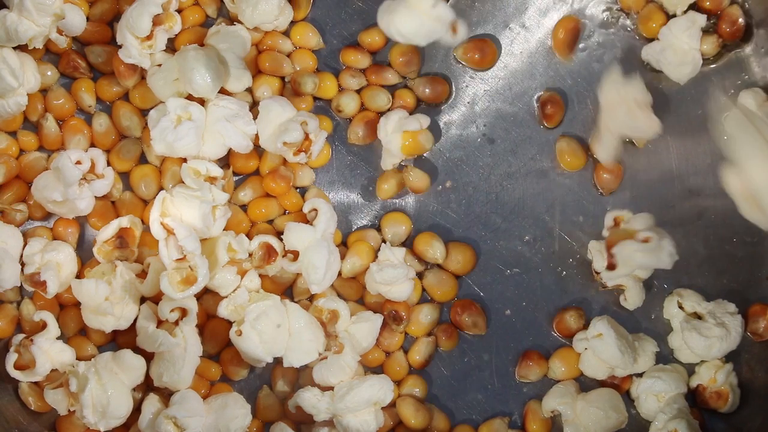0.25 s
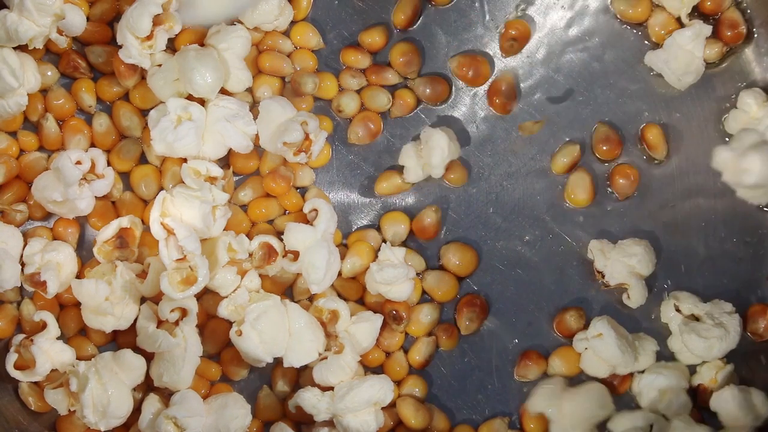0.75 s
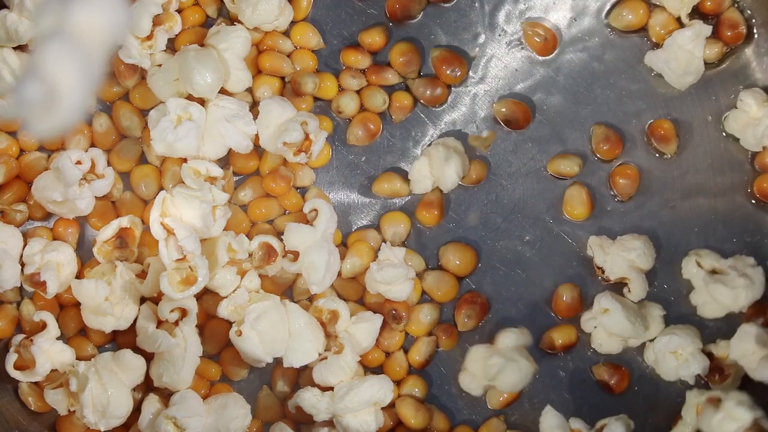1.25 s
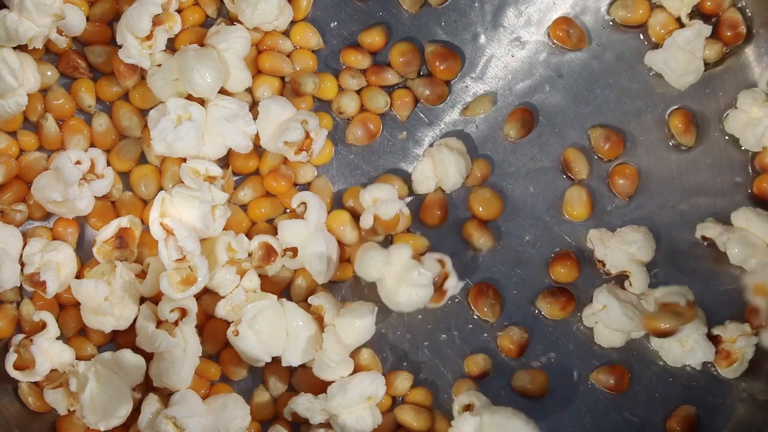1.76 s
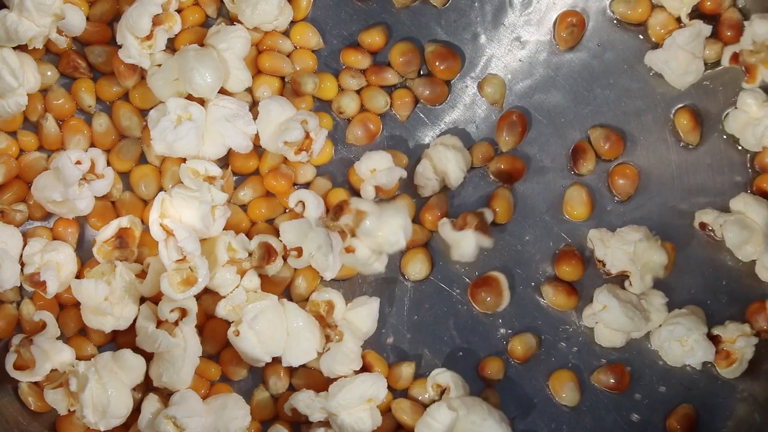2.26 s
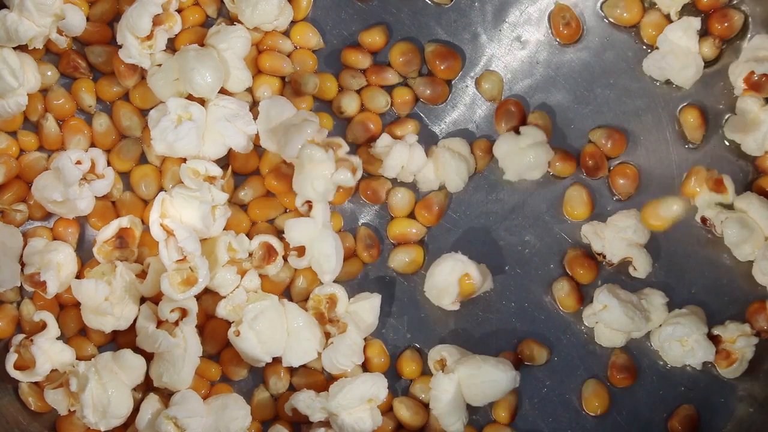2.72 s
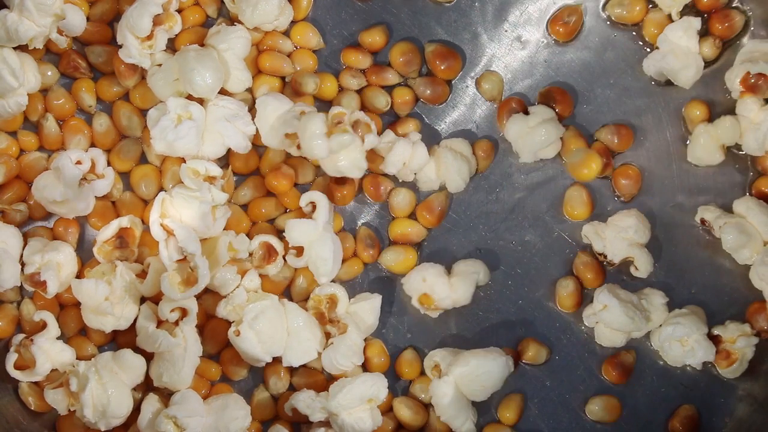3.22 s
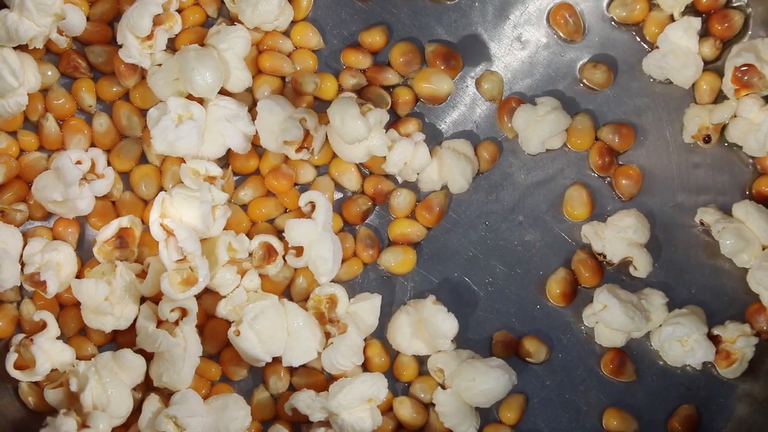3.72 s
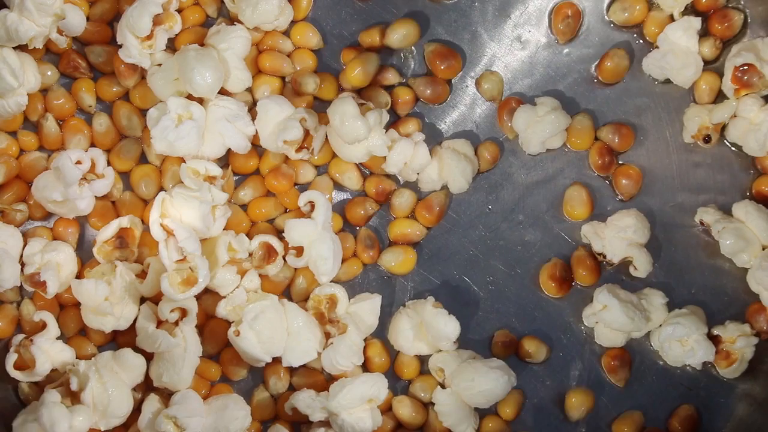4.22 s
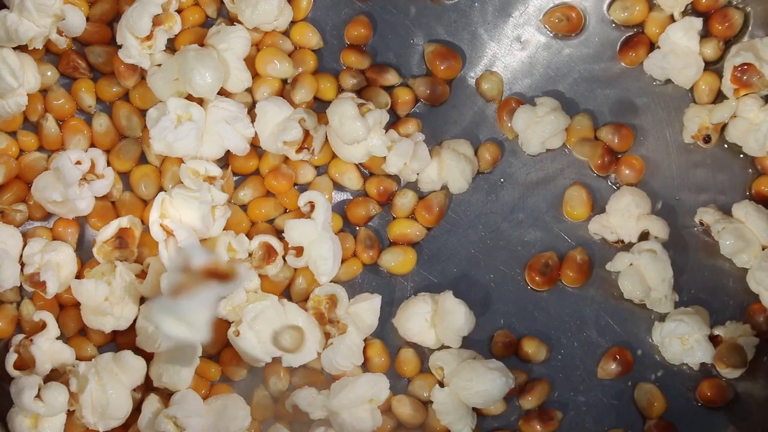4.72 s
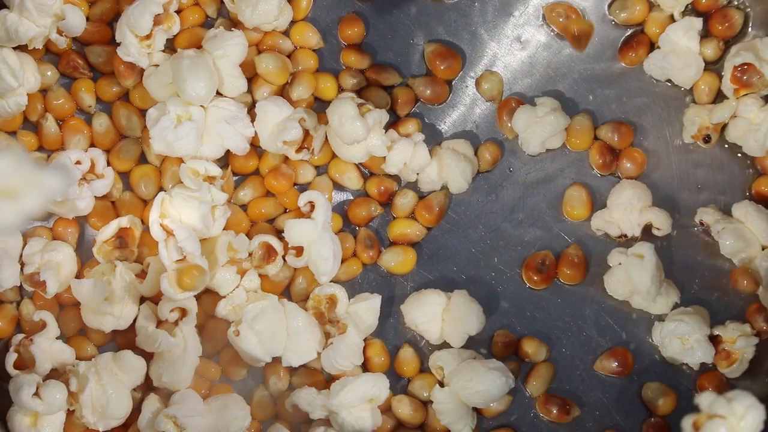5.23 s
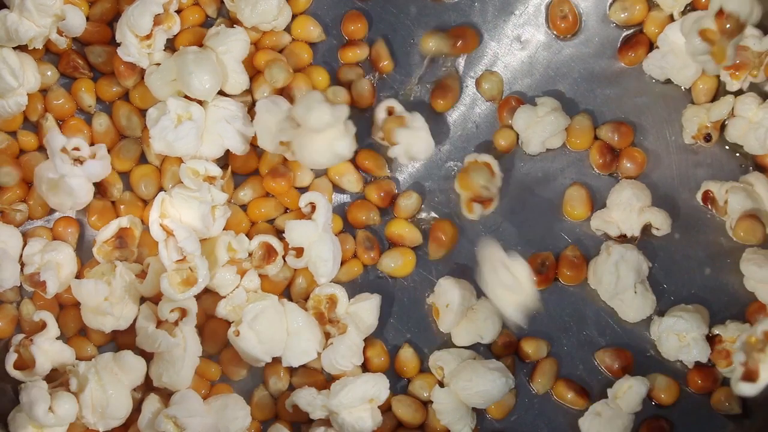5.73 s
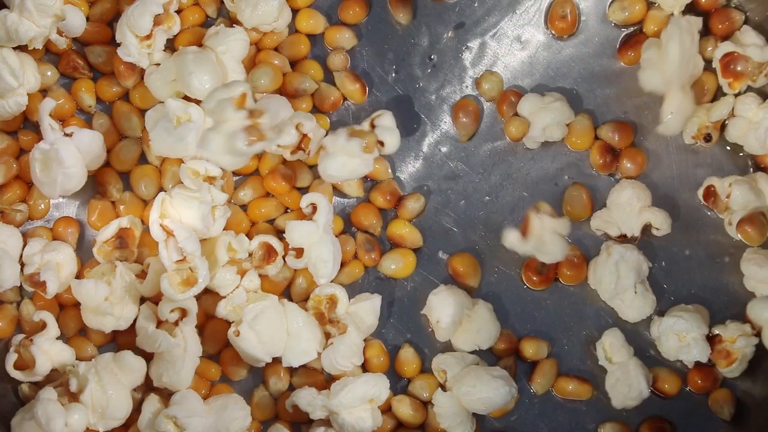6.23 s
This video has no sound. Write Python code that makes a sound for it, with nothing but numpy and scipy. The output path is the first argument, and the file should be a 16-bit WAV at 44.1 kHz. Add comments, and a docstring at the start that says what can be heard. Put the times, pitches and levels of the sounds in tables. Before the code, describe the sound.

Close to a hot metal pan in a kitchen, slowed popcorn bursts sound deep and muffled. A loud crackling cluster comes at the start, single and double pops follow, then a long quiet simmer, another hard double bang, and a final flurry with a brief metallic ring. Light kernel taps follow the pops; oil sizzles faintly underneath.

```python
"""A kitchen, close to a hot metal pan: corn pops in slow motion, so that everything is deep and dull.
Each burst of steam is one pressure pulse that echoes between the pan's walls, rings the air inside and
dies away in the room. Kernels landing in the pan are softer pulses; the metal rings as decaying modes.
Coloured noise sizzles softly underneath as oil, with faint hum and leaking steam.
The loudest pops overload into a brief crackle."""
import sys
import numpy as np
from scipy import signal
from scipy.fft import rfft, irfft, next_fast_len
from scipy.io import wavfile
from scipy.ndimage import map_coordinates

SR = 44100
rng = np.random.default_rng(int(sys.argv[2]) if len(sys.argv) > 2 else 0)


def master_out(mix):
    """Clip the mix to full scale and print it as 16-bit PCM to the path in sys.argv[1]."""
    frames = np.transpose(np.atleast_2d(mix))
    ceiling = np.clip(frames, -1, 1)
    pcm = np.round(ceiling * 32767).astype(np.int16)
    wavfile.write(sys.argv[1], SR, pcm)


N = 285327  # length in samples
BAND_HZ = 1840  # upper band edge left by the slow motion


def amp(db):
    """Level law: decibels to amplitude gain."""
    return 10 ** (np.asarray(db) / 20)


def unit(x):
    """Normalisation: scale to an rms of 1."""
    return x / np.sqrt(np.mean(x ** 2) + 1e-20)


def along(points, hz):
    """Interpolation on a logarithmic frequency axis through (Hz, value) points."""
    f, value = np.transpose(points)
    return np.interp(np.log(hz + 1), np.log(f + 1), value)


def wobble(rate):
    """Smooth random modulation: a curve through random knots, rate of them a second."""
    knots = rng.standard_normal(int(N * rate / SR) + 4)
    return map_coordinates(knots, [np.arange(N) * rate / SR])


def filtered(x, response):
    """Linear filtering: the spectrum of x times a complex response of frequency."""
    n = x.shape[-1]
    padded = next_fast_len(n + 8192)
    spectrum = rfft(x, padded) * response(np.fft.rfftfreq(padded, 1 / SR))
    return irfft(spectrum, padded)[..., :n]


def add(track, s, sound):
    """Superposition: mix a sound into a track at s seconds, cutting what falls outside."""
    start = round(s * SR)
    sound = sound[..., max(-start, 0):]
    part = track[..., max(start, 0):][..., :sound.shape[-1]]
    part += sound[..., :part.shape[-1]]


def slowed(hz):
    """Frequency scaling: slow motion leaves almost nothing above a low band edge."""
    return 1 / np.sqrt(1 + (hz / BAND_HZ) ** 60)


def ringing(modes, t, scatter_db):
    """Modal decay: modes of random strength for each blow, with random phases in each channel."""
    hz, db, t60 = np.transpose(modes)[:, :, None]
    wave = amp(db - 60 * t / t60) * np.exp(2j * np.pi * hz * t)
    strength = amp(scatter_db * rng.standard_normal((2, len(modes))))
    phase = np.exp(2j * np.pi * rng.random((2, len(modes))))
    return ((strength * phase) @ wave).real


# Likeness of the two channels in noise. Each row: frequency in Hz, correlation from -1 to 1.
LIKENESS = [(25, 0.88), (60, 1), (120, -0.048), (200, -0.38), (370, 0.18), (470, -0.091), (700, 0.37),
            (1000, -0.099), (1900, 0.024)]


def noise_pair(spectrum, count):
    """Interchannel coherence: coloured stereo noise of rms 1 whose likeness varies with frequency."""
    def colour(hz):
        angle = np.arccos(np.clip(along(LIKENESS, hz), -1, 1)) / 2
        return amp(along(spectrum, hz)) * slowed(hz) * np.array([np.cos(angle), np.sin(angle)])

    mid, side = filtered(rng.standard_normal((2, count)), colour)
    return unit(np.array([mid + side, mid - side]))


FRONT_PER_PITCH = 0.3  # a higher pulse has a sharper front


def burst(pitch_hz, base_front_hz):
    """Pressure release: one pulse of peak 1, a sharp dip and then a broader push."""
    kick = np.zeros(SR // 20)
    kick[0] = 1
    front_hz = base_front_hz + FRONT_PER_PITCH * pitch_hz

    def response(f):
        puff = -1j * f * pitch_hz / (pitch_hz ** 2 - f ** 2 + 1j * f * pitch_hz)
        front = front_hz ** 2 / (front_hz ** 2 - f ** 2 + 1.2j * f * front_hz)
        return puff * front

    pulse = filtered(kick, response)
    return pulse / np.abs(pulse).max()


# Kernels bursting. Each row: start in seconds, peak of the direct pulse in dB, pitch in Hz,
# weakening of the right channel in dB, kick on the pan's bottom in dB.
POPS = [(-0.08, -8, 152, 1, -38), (0.0668, 5.5, 208, 0.5, -17.5), (1.0583, 3, 455, 2.5, -27.5),
        (1.6174, -16.5, 207.6, -1.5, -42.5), (1.703, -30.5, 800, -8.5, -62), (1.771, -15, 243, -4, -33.5),
        (2.3422, -0.5, 163.7, 4, -17), (2.4284, -3, 280, 5, -41.5), (4.3156, 0.5, 284, 0, -19.5),
        (4.343, 1, 280, -1.5, -22), (5.8439, -12.5, 826, -1, -27.5), (5.8648, -12.5, 917, -5.5, -27.5),
        (5.955, -10, 473, 1, -31), (6.078, 5, 242, -3.5, -35), (6.4268, 0.5, 172, 8, 0.5)]
# ring of a full-scale burst in dB; weaker bursts lie further off and ring more
POP_RING_DB, RING_DB_PER_DB = -0.82, 0.41


def bursts():
    """Sudden expansion: steam breaks out in a deep pulse, as (s, pulse, ring dB, right weakening dB)."""
    return [(s, amp(db) * burst(pitch_hz, base_front_hz=620), POP_RING_DB - RING_DB_PER_DB * db, right_weaker_db)
            for s, db, pitch_hz, right_weaker_db, _ in POPS]


# The hull tearing further after a burst. Each row: start in seconds, peak of the direct pulse in dB,
# pitch in Hz, weakening of the right channel in dB.
SNAPS = [(0.0879, 7, 550, 1.5), (0.0937, 4, 330, 4), (0.0975, 3.5, 1090, 3), (0.1028, -1.5, 1114, 1.5),
         (0.1075, -3, 825, 16), (1.0729, 1, 555, 5), (1.7841, -9, 710, 18), (2.3556, -5.5, 260.6, 5),
         (2.358, -10.5, 1400, 4), (2.3689, -9, 910, 3), (4.3497, 5, 515, 2), (4.3541, 0.5, 629, 6),
         (4.3587, 1.5, 793, 5), (4.3675, 1.5, 1093, 7), (5.8772, -12, 1058, 10), (5.884, -14, 199.5, 0),
         (6.09, 6.5, 646, 16), (6.437, -0.5, 702, 3.5)]
# a snap closer to the left is also drier
SNAP_RING_DB, DRY_DB_PER_DB = -6, 0.9


def snaps():
    """Fracture: the hull tears on in drier, sharper pulses."""
    return [(s, amp(db) * burst(pitch_hz, base_front_hz=826),
             SNAP_RING_DB - DRY_DB_PER_DB * right_weaker_db, right_weaker_db)
            for s, db, pitch_hz, right_weaker_db in SNAPS]


# Kernels landing in the pan. Each row: start in seconds, peak of the direct pulse in dB.
KNOCKS = [(0.1486, -12.5), (0.1724, -20), (0.1811, -19), (0.2375, -20), (0.2498, -37), (0.3326, -27),
          (0.6279, -29.5), (1.136, -18.5), (1.1553, -20.5), (1.178, -28), (1.3971, -36), (1.7268, -27.5),
          (1.745, -29), (2.9236, -31), (3.78, -37), (4.144, -30.5), (4.4368, -20), (4.5476, -29),
          (5.916, -19.5)]
KNOCK_HZ, KNOCK_SPREAD = 760, 0.12  # typical pitch; its scatter in octaves
KNOCK_RING_DB, KNOCK_RIGHT_WEAKER_DB = -5.5, 3.5


def knocks():
    """Impact: tossed kernels land with light, much alike taps."""
    pitches = KNOCK_HZ * 2 ** (KNOCK_SPREAD * rng.standard_normal(len(KNOCKS)))
    return [(s, amp(db) * burst(pitch_hz, base_front_hz=560), KNOCK_RING_DB, KNOCK_RIGHT_WEAKER_DB)
            for (s, db), pitch_hz in zip(KNOCKS, pitches)]


# Early echoes off the pan's walls. Each row: delay in seconds, relative left gain, relative right gain.
WALLS = [(.0087, 0.89, 0.16), (0.0092, 0.19, -0.17), (0.012, -0.96, -0.0031), (0.0133, -0.59, 0.27),
         (0.0204, -0.14, 0.19), (0.0269, -0.17, .06)]


def wall_echoes(pulse, low_cut_hz):
    """Specular reflection: the walls send back thinner copies of a pulse."""
    thin = filtered(pulse, lambda f: 1j * f / (low_cut_hz + 1j * f))
    echoes = np.zeros((2, 2 * len(pulse)))
    for delay, left, right in WALLS:
        add(echoes, delay, np.outer([left, right], thin))
    return echoes


# Colour of the diffuse tail. Each row: frequency in Hz, relative level in dB per Hz.
TAIL = [(25, 2.5), (60, 0.5), (110, -5.5), (160, -6.5), (230, -7), (340, -5.5), (700, -1.5), (1000, 2),
        (1400, -1), (1900, 7.5)]
# Decay of the kitchen. Each row: frequency in Hz, t60 in seconds.
KITCHEN = [(60, 0.48), (160, 0.41), (420, .4), (1100, 0.32), (1900, 0.32)]
# Modes of the air in the pan. Each row: frequency in Hz, relative level in dB, t60 in seconds.
AIR = [(117.8, -6.5, 0.33), (233.7, -10.5, 0.37), (317.6, 2, 0.24), (345, -5.5, 0.37), (413.5, -8, 0.38),
       (466, -5, 0.36), (613.6, 4, 0.18), (681.5, 1, 0.3), (756, -6.5, 0.29), (812, -12.5, 0.44),
       (900, 3, 0.12), (1019, -6, 0.38), (1130, -9.5, 0.31), (1220, -10.5, .3), (1400, -17, 0.42),
       (1700, -8, .28)]


def reverberation(t, scatter_db, scatter_t60, room_db, air_db, build_s):
    """Diffuse field: dense scatter in the pan dies fast; the pan's air and the kitchen ring on."""
    scatter = amp(scatter_db - 60 * t / scatter_t60) * noise_pair(TAIL, len(t))
    hz, when, cells = signal.stft(noise_pair(TAIL, len(t)), SR, nperseg=512)
    decay = amp(-60 * when / along(KITCHEN, hz)[:, None])
    room = signal.istft(cells * decay, SR, nperseg=512)[1][:, :len(t)]
    air = ringing(AIR, t, scatter_db=3)
    build_up = 1 - np.exp(-(t / build_s) ** 2)
    return (scatter + amp(room_db) * room + amp(air_db) * air) * build_up


def hollow(hz, dip_hz, width_hz, depth):
    """Resonant absorption: the pan swallows part of one low band of every pulse."""
    return 1 - depth * 1j * hz * width_hz / (dip_hz ** 2 - hz ** 2 + 1j * hz * width_hz)


def in_pan(pulses, lag_s, left_db, right_db):
    """Propagation: each pulse arrives directly, later on the left, then as echoes and reverberation."""
    out, t = np.zeros((2, N)), np.arange(SR // 3) / SR
    for s, pulse, ring_db, right_weaker_db in pulses:
        add(out[0], s + lag_s / 2, pulse)
        add(out[1], s - lag_s / 2, amp(-right_weaker_db) * pulse)
        add(out, s, amp(ring_db / 2) * wall_echoes(pulse, low_cut_hz=430))
        tail = reverberation(t, scatter_db=-36.0, scatter_t60=0.11, room_db=-49.0, air_db=-57.5, build_s=0.0056)
        rung = signal.fftconvolve(pulse[None], tail, axes=1)
        add(out, s, amp(ring_db) * amp([[left_db], [right_db]]) * rung)
    return filtered(out, lambda hz: hollow(hz, dip_hz=147, width_hz=34, depth=0.33))


# Swings of the pan's bottom. Each row: frequency in Hz, relative level in dB, share of the kick's t60.
BOTTOM = [(49, 0, 0.9), (84, -1, 0.5), (112.7, -10, 1)]
# decay in seconds after a full-scale kick; gentler kicks swing longer
KICK_T60, KICK_DAMPING_PER_DB = 0.2, 0.0152


def thumps(rise_s):
    """Plate vibration: each burst kicks the pan's bottom, which swings like a slack drum."""
    out, t = np.zeros(N), np.arange(SR // 2) / SR
    for s, *_, kick_db in POPS:
        t60 = KICK_T60 * np.exp(-KICK_DAMPING_PER_DB * kick_db)
        swing = sum(amp(level_db - 60 * t / (share * t60)) * np.sin(2 * np.pi * hz * t)
                    for hz, level_db, share in BOTTOM)
        add(out, s, amp(kick_db) * swing * (1 - np.exp(-t / rise_s)))
    return out


# The pan's metal ringing, set off by a pop or a striking kernel.
# Each row: start in seconds, relative strength in dB.
CLANGS = [(5.8643, -43), (6.09, -31), (6.331, -29.5), (6.3426, -24), (6.362, -30.5), (6.388, -28.5)]
# Modes of the pan's metal. Each row: frequency in Hz, relative level in dB, t60 in seconds.
METAL = [(344, -6, 1), (428, -6, .5), (462, -0.5, 0.9), (465, -12, 0.86), (587, -5.5, 0.16),
         (564, -4, 0.77), (638.5, 6, 0.16), (720, 0.5, 0.33), (783, 1, 0.29), (757, -3, 0.36),
         (895, -11, .12)]


def clangs(right_db):
    """Modal excitation: the pan's metal rings, set off by a pop or a striking kernel."""
    out, t = np.zeros((2, N)), np.arange(SR // 2) / SR
    onset = 1 - np.exp(-t / 0.00058)
    for s, db in CLANGS:
        add(out, s, amp(db) * ringing(METAL, t, scatter_db=-2.0) * onset)
    return out * amp([[0], [right_db]])


# How hard the oil simmers, in stretches joined by straight lines.
# Each row: time in seconds, simmer strength in dB.
SIMMER = [
    [(0.7, -53.5), (1.0, -54)],
    [(1.95, -49), (2.106, -54), (2.28, -51)],
    [(2.65, -46), (3.012, -44), (4.1, -45)],
    [(4.7, -54), (5.556, -46), (5.75, -46)],
]
CALM_DB = -54  # simmer strength counted as calm


def simmer_level(calm_db, growth):
    """Common drive: a layer's level in dB, calm_db plus growth dB for each dB of simmer."""
    s, strength_db = np.transpose(np.concatenate(SIMMER))
    return calm_db + growth * (np.interp(np.arange(N) / SR, s, strength_db) - CALM_DB)


# Colours of the simmer's three layers. Each row: frequency in Hz, relative level in dB per Hz.
RUMBLE = [(8, -3.5), (25, 6.5), (40, -5.5), (58, -2.5), (80, -14.5), (130, -22), (300, -66)]
BUBBLING = [(40, -22.5), (90, -5.5), (170, 2), (300, -4.5), (450, -7.5), (700, -23.5), (1500, -50.5)]
SIZZLE = [(200, -14.5), (450, -4.5), (620, 0.5), (780, -1), (1000, -5), (1400, -9.5), (1900, -13.5)]


def simmer(grain_db):
    """Modulated noise: oil bubbles and sizzles in small uneven spurts over a low rumble."""
    low_level = simmer_level(calm_db=-52, growth=1.185) + 0.85 * wobble(11)
    low = amp(low_level) * noise_pair(RUMBLE, N)
    body_level = simmer_level(calm_db=-53, growth=0.96) + 0.33 * wobble(25)
    body = amp(body_level) * noise_pair(BUBBLING, N)
    spurts = unit(amp(grain_db * wobble(280) + 1.7 * wobble(4.08)))
    fizz = amp(simmer_level(calm_db=-55.0, growth=0.66)) * spurts * noise_pair(SIZZLE, N)
    # every layer leans to the left
    return low * amp([[.8], [-.8]]) + body * amp([[.9], [-.9]]) + fizz * amp([[2.5], [-2.5]])


# The pan's faint hum. Each row: frequency in Hz, relative level in dB.
HUM = [(167, -5), (280, -4.5), (312, -7), (560, -15)]


def hum(drift):
    """Phase modulation: a few faint low tones that waver, by drift in radians, and rise with the simmer."""
    t = np.arange(N) / SR
    tones = sum(amp(db) * np.sin(2 * np.pi * hz * t + drift * wobble(7)) for hz, db in HUM)
    return np.sqrt(2) * amp(simmer_level(calm_db=-69, growth=1.85)) * tones


# Steam leaking from a hull before it bursts.
# Each row: time of full flow in seconds, length held in seconds, level in dB before the lean to the left.
LEAKS = [(5.247, 0.086, -48), (5.451, 0.16, -58), (5.908, 0.16, -39)]
LEAK_ATTACK_S, LEAK_RELEASE_T60 = 0.088, 0.74  # both in seconds


def steam(centre_hz, width_hz):
    """Resonant jet noise: a soft, narrow whistle of steam; each leak opens, holds and fades."""
    t = np.arange(N) / SR
    flow = np.zeros(N)
    for s, length, db in LEAKS:
        opening = np.clip((t - s) / LEAK_ATTACK_S + 1, 0, 1)
        flow += opening * amp(db - 60 * np.maximum(t - s - length, 0) / LEAK_RELEASE_T60)
    resonance = lambda f: 1j * f * width_hz / (centre_hz ** 2 - f ** 2 + 1j * f * width_hz)
    return flow * unit(filtered(noise_pair(SIZZLE, N), resonance)) * amp([[1.5], [-1.5]])


def scene():
    """Superposition of sources: pops, knocks and simmering oil in one pan."""
    corn = in_pan(bursts() + snaps() + knocks(), lag_s=0.00017, left_db=7.0, right_db=2.0)
    hits = corn + thumps(rise_s=0.0069) + clangs(right_db=-4.5)
    return filtered(hits, slowed) + simmer(grain_db=0.74) + hum(drift=.45) + steam(centre_hz=772, width_hz=27)


def record(dry):
    """Saturation: loud pops flatten near full scale, which adds their only treble, a mellow crackle."""
    hardness = 16
    clipped = dry / (1 + np.abs(dry) ** hardness) ** (1 / hardness)
    # Treble response. Each row: frequency in Hz, gain in dB.
    treble = [(1900, 0), (2600, -8.5), (4500, -0.5), (7500, 0.0), (12000, 0.5)]
    top_hz = 17000
    band_limit = lambda hz: 1 / np.sqrt(1 + (hz / top_hz) ** 40)
    return filtered(clipped, lambda hz: amp(along(treble, hz)) * band_limit(hz))


dry = scene()
out = record(dry)
master_out(out)
```